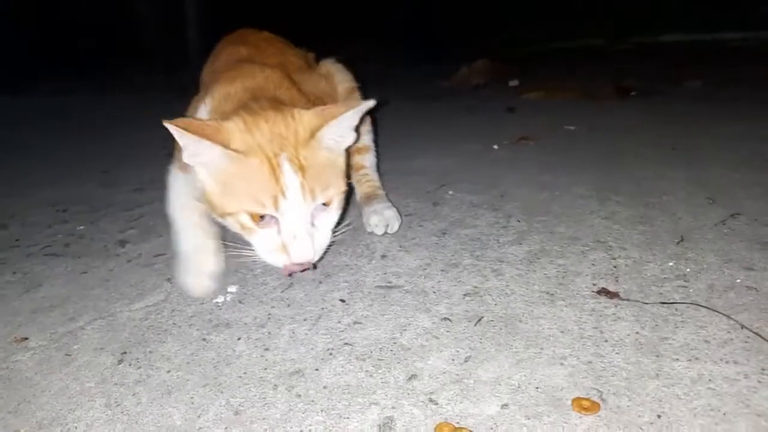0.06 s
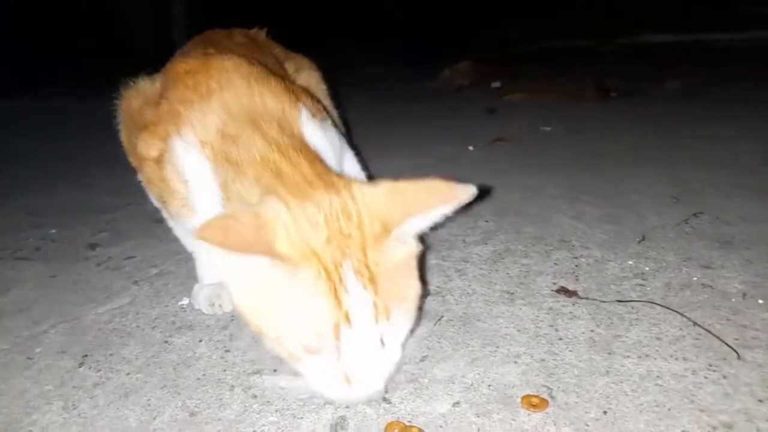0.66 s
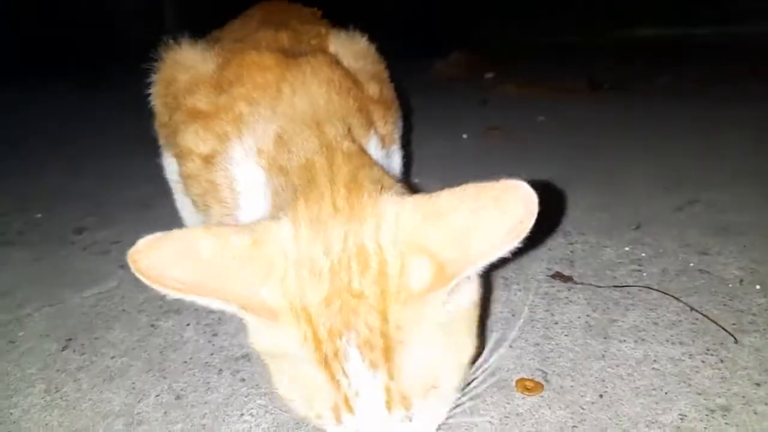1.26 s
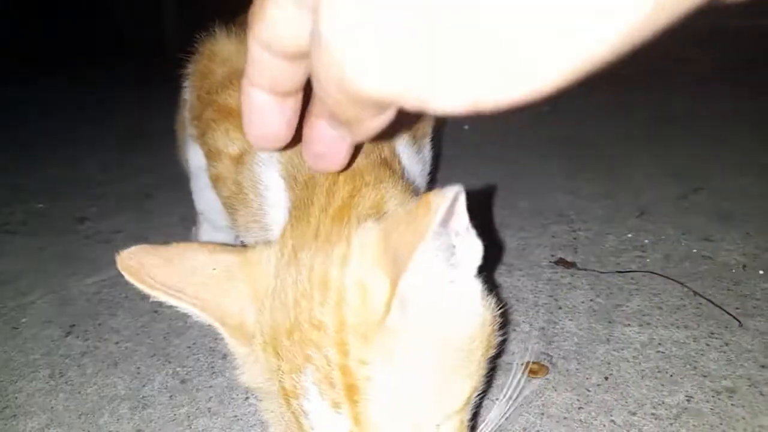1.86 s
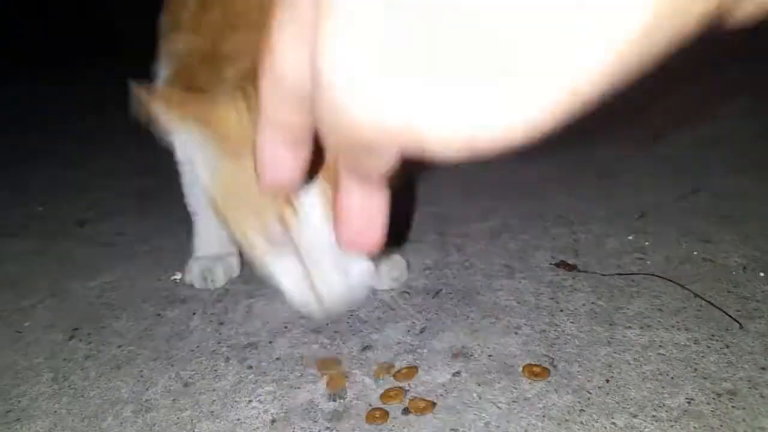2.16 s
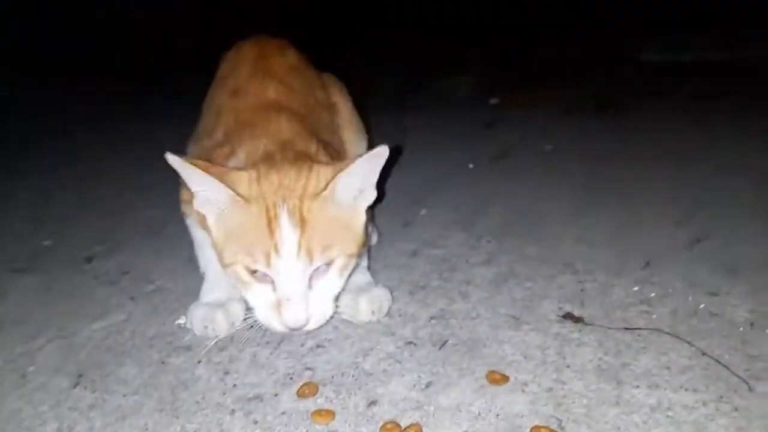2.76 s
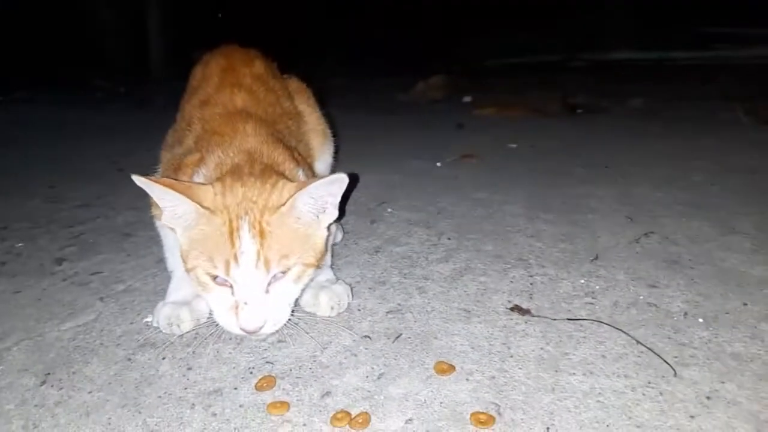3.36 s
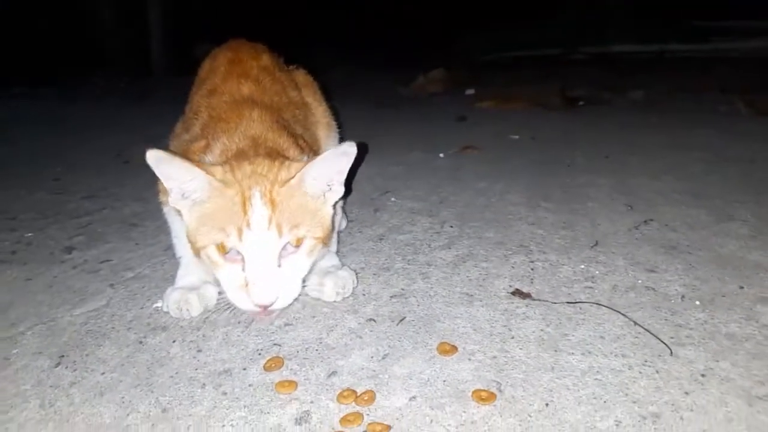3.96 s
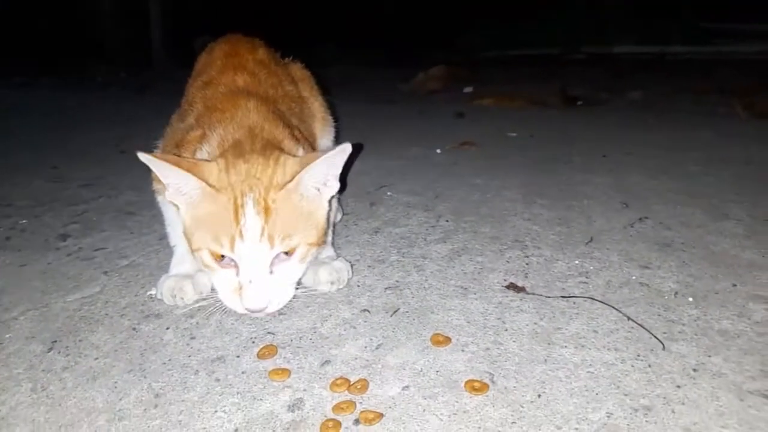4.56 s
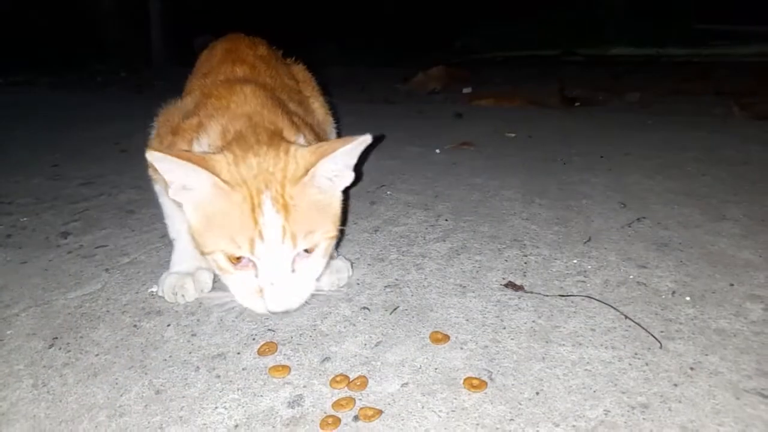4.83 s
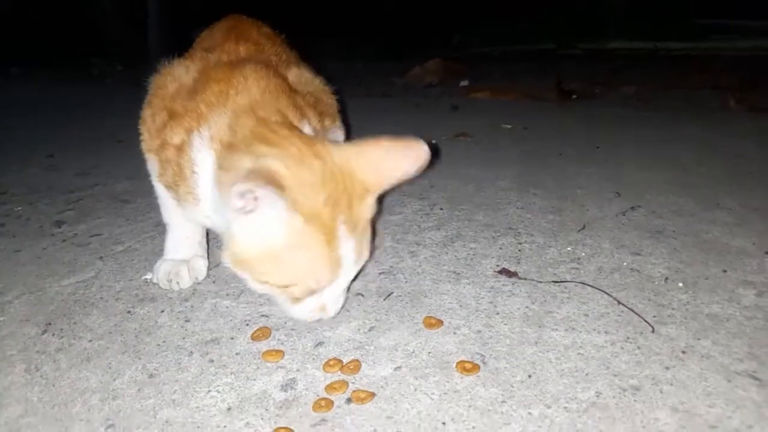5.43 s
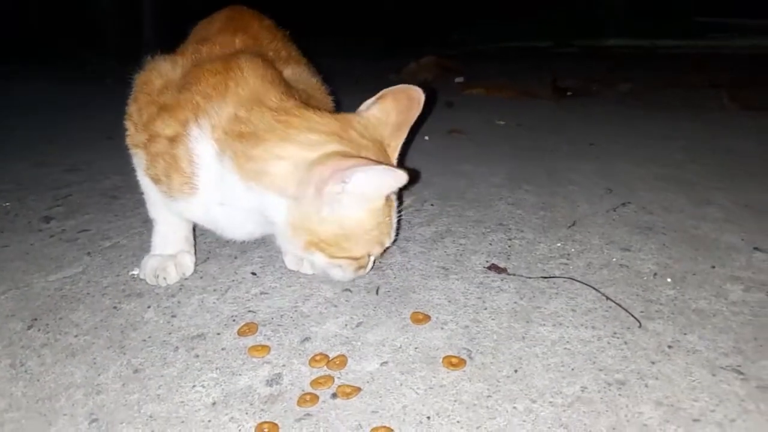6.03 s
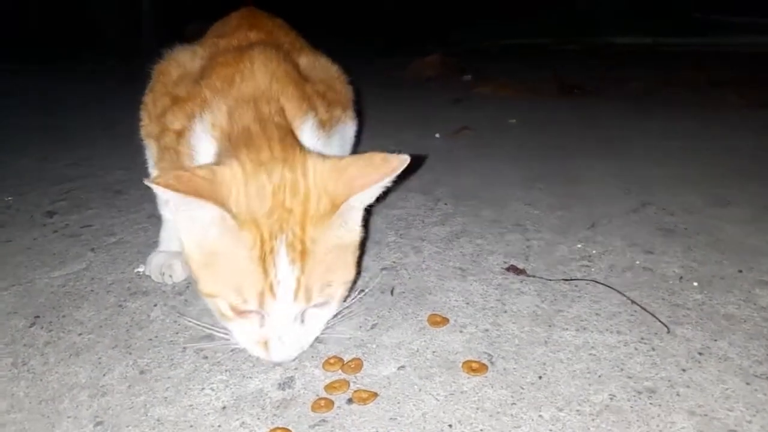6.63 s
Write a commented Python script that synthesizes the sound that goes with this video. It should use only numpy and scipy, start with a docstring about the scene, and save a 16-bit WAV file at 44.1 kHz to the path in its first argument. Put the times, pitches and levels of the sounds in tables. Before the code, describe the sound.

A low distant rumble and a faint high band of insects run throughout, heard in stereo in a concrete yard at night. In the first second a cat's paws tap very softly. A night bird gives faint thin peeps at about 0.7, 1.2, 1.8 and 4.3 seconds. Around 1.5 seconds a hand lightly brushes fur. From 2 seconds a sandal drags on grit to the right, ending in a sharp, loud scuff and low thud at 2.2. Close in front, the cat cracks and grinds dry kibble from 2.7 to 3.9 seconds, with the crispest bites between 3 and 3.4. A soft raspy lick follows near 4.2, with a fainter bite and lick around 4.5. From 4.9 seconds a food bag rustles and crackles on the right in uneven bursts, loudest around 5.6, thinning to separate crinkles by the end at about 6.6.

```python
"""A cat cracks and grinds dry kibble on a concrete yard at night, close in front of a stereo microphone pair.
Its paws tap the ground, a hand strokes its fur and a sandal scuffs the grit before it bites and licks.
Later, off to the right, a food bag rustles as its walls rub and its folds buckle.
Behind it all: a low distant rumble, a band of insects and a few thin peeps of a night bird."""
import sys
import numpy as np
from scipy import signal
from scipy.fft import rfft, irfft
from scipy.io import wavfile
from scipy.ndimage import uniform_filter1d

SR = 44100
rng = np.random.default_rng(int(sys.argv[2]) if len(sys.argv) > 2 else 0)


def master_out(mix):
    """Clip the mix to full scale and print it as 16-bit PCM to the path in sys.argv[1]."""
    frames = np.transpose(np.atleast_2d(mix))
    ceiling = np.clip(frames, -1, 1)
    pcm = np.round(ceiling * 32767).astype(np.int16)
    wavfile.write(sys.argv[1], SR, pcm)


N = 295029
TIME = np.arange(N) / SR

# reverberation of the walls around the yard: f/Hz, t60/s
YARD = [(200, 0.53), (900, .33), (2500, 0.26), (7000, 0.24), (14000, 0.3)]
# bites: t/s, crack length/s, level/dB, treble/dB, bass/dB, grinding level/dB, mouth resonance/Hz
BITES = [(2.7465, .0021, -64, 4, 3, -74, 3600), (2.7707, 0.0073, -60.5, -2, -10, -79.5, 3650),
         (2.7751, 0.0054, -46.5, 2, -7.5, -72, 3680), (2.9888, 0.0025, -35.5, 1, -28, -78, 3600),
         (2.9935, 0.0018, -30.5, 1.5, 5, -63, 3720), (3.1166, 0.00089, -30, -5, -4, -62.5, 3800),
         (3.2468, .0027, -32.5, -5, 0.5, -62.5, 3940), (3.3604, 0.0024, -34, -5, -1.5, -68, 4000),
         (3.7414, 0.0024, -62, 9, -7, -79, 3630), (3.772, 0.0015, -58.5, 12, 1, -82.5, 3560),
         (3.83, 0.0059, -50.5, 8.5, 17, -98, 3640), (4.479, 0.004, -64, -5, 12, -84, 3720)]


def amp(db):
    """Decibels to gain."""
    return 10 ** (np.asarray(db) / 20)


def unit_rms(x):
    """Scales to rms 1."""
    return x / np.sqrt(np.mean(x ** 2) + 1e-20)


def read(points, hz):
    """Reads a spectrum table on a log-frequency axis."""
    f, value = np.transpose(points)
    return np.interp(np.log(hz + 1), np.log(f + 1), value)


def add(mix, s, sound):
    """Mixes a sound in at s seconds."""
    part = mix[round(s * SR):][:len(sound)]
    part += sound[:len(part)]


def colour(x, shape, size=4096):
    """Minimum-phase filter whose gain in dB is shape(Hz)."""
    log_gain = np.log(amp(shape(abs(np.fft.fftfreq(size, 1 / SR)))) + 1e-6)
    ring = np.fft.ifft(np.exp(np.conj(signal.hilbert(log_gain)))).real
    return signal.fftconvolve(x, ring[:size // 2])[:len(x)]


def noise(spectrum):
    """Steady noise of rms 1 with a given spectrum."""
    gain = amp(read(spectrum, np.fft.rfftfreq(N, 1 / SR)))
    return unit_rms(irfft(rfft(rng.standard_normal(N)) * gain, N))


def drift(samples, passes=1):
    """Random wander of rms 1: noise under a moving average."""
    wander = rng.standard_normal(N)
    for _ in range(passes):
        wander = uniform_filter1d(wander, samples)
    return unit_rms(wander)


def grit(per_s, spread_db, smooth):
    """Tiny slips of uneven size over a share of smooth friction noise."""
    sizes = amp(spread_db * np.minimum(rng.exponential(1, N), 4)) * rng.choice([-1, 1], N)
    slips = sizes * (rng.random(N) < per_s / SR)
    return unit_rms(slips) + smooth * rng.standard_normal(N)


def friction(spectrum, per_s, spread_db, smooth):
    """Gritty slipping, coloured by a material's spectrum, at rms 1."""
    return unit_rms(colour(grit(per_s, spread_db, smooth), lambda hz: read(spectrum, hz)))


def swells(rows, rise_s, fall_s):
    """Gain over time of rows (t/s, hold/s, level/dB) that each rise, hold and die away."""
    power = np.zeros(N)
    for s, hold_s, db in rows:
        t = TIME - s
        attack = np.clip(t / rise_s, 0, 1) ** 2
        decay = np.exp(-np.clip((t - rise_s - hold_s) / fall_s, 0, 20))
        power += (amp(db) * attack * decay) ** 2
    return np.sqrt(power)


def bursts(rows, body, fall, uneven_db, rise=0.1, size=4096):
    """Each row is a quick avalanche of tiny fractures that rings a body."""
    out, t = np.zeros(N), np.arange(size) / SR
    for s, length, db, treble_db, bass_db, *_ in rows:
        push, sizes = rng.standard_normal((2, size))
        swell = (1 - np.exp(-t / (rise * length))) * np.exp(-(fall * t / length) ** 2)
        cracks = push * amp(uneven_db * np.clip(sizes, -2, 2)) * swell
        treble = lambda hz: treble_db * hz ** 4 / (hz ** 4 + 7600 ** 4)
        bass = lambda hz: bass_db / (1 + (hz / 1200) ** 4)
        sound = colour(cracks, lambda hz: body(hz) + treble(hz) + bass(hz))
        add(out, s, amp(db) * np.sqrt(length * SR) * sound / np.linalg.norm(sound))
    return out


def scatter(x, t60s, delay_s, size=22050):
    """Sparse reflections, different at each microphone, dying away by rows of f/Hz, t60/s."""
    taps = rng.choice([-1., 1.], (2, size)) * (rng.random((2, size)) < 5000 / SR)
    taps *= np.arange(size) > delay_s * SR
    hz, t, bands = signal.stft(taps, SR, nperseg=128)
    tail = signal.istft(bands * amp(-60 * t / read(t60s, hz)[:, None]), SR, nperseg=128)[1]
    tail /= np.linalg.norm(tail, axis=1, keepdims=True)
    return signal.fftconvolve(x[None], tail, axes=1)[:, :N]


def from_right(x, lag_s):
    """Sound from the right reaches the left microphone late and shaded."""
    # shading of the far microphone: f/Hz, left minus right/dB
    shade = [(100, -8), (1000, 0.5), (2400, -3.5), (4400, -2.5), (8200, -42.5), (14000, -3.5)]
    hz = np.fft.rfftfreq(N, 1 / SR)
    left = amp(read(shade, hz)) * np.exp(-2j * np.pi * hz * lag_s)
    pair = np.array([left, np.ones(len(hz))]) / np.sqrt((1 + abs(left) ** 2) / 2)
    return irfft(rfft(x) * pair, N)


def paired(source, likeness):
    """One noisy source at two microphones: the part each hears alone, and the common part."""
    return np.sqrt(1 - likeness) * np.array([source(), source()]), np.sqrt(likeness) * source()


def night_air():
    """Distant rumble, mostly common to both microphones, and hiss from all around."""
    # spectra of the night air: f/Hz, relative level/dB
    rumble_spectrum = [(20, -40), (40, -12.5), (68, 2), (90, -2), (120, 1.5), (200, -4.5), (270, -13),
                       (400, -22), (600, -37.5), (1200, -54.5), (4000, -81)]
    hiss_spectrum = [(100, 15.5), (1000, -0.5), (2500, -0.5), (4500, -5.5), (9000, -2), (12000, -6),
                     (16000, -6.5)]
    rumble = noise(rumble_spectrum) * amp([[-2.2], [1.5]])
    rumble += amp(-8) * np.array([noise(rumble_spectrum), noise(rumble_spectrum)])
    hiss = np.array([noise(hiss_spectrum), noise(hiss_spectrum)])
    return amp(-58.5) * rumble + amp(-76.5) * hiss


def insects():
    """A high choir all around the yard swells and ebbs gently."""
    # band of the choir: f/Hz, relative level/dB
    band = [(5000, -43.5), (5900, -22), (6400, -5.5), (6800, -2.5), (7300, -5), (8000, -16.5), (9500, -28),
            (12000, -28.5)]
    choir = np.array([noise(band), noise(band)]) * amp([[-1.2], [1.2]])
    ebb = amp(0.9 * drift(samples=9000, passes=2))
    return amp(-75.5) * choir * ebb


def paws():
    """Soft pads make dull taps on the concrete."""
    # paws set down: t/s, length/s, level/dB, treble/dB, bass/dB
    steps = [(.045, 0.0035, -76, -3, 13), (.092, 0.0035, -81, -6, 20), (.181, 0.0078, -72.5, 3, 13),
             (.358, .005, -84, -6, 9), (.757, 0.0026, -75, -5, -19), (4.765, 0.0016, -74, -11, 8)]
    pad = [(200, -22), (1200, 6), (2500, -4), (6000, -26), (14000, -4)]  # f/Hz, gain/dB
    taps = bursts(steps, lambda hz: read(pad, hz), fall=1.1, uneven_db=3)
    return taps + amp(-2) * scatter(taps, YARD, delay_s=0.0037)


def bird():
    """Thin, two-voiced peeps in the background scoop up to pitch and echo briefly in the yard."""
    # peeps: t/s, hold/s, relative level/dB, pitch/Hz
    peeps = [(.745, 0.069, -70, 3065), (1.233, .025, -71, 3125), (1.79, 0.083, -76.5, 3100),
             (4.3, .11, -73.5, 3140)]
    scoop_hz, scoop_s = 225, 0.022
    song = np.zeros(N)
    for s, hold_s, db, top_hz in peeps:
        hz = top_hz - scoop_hz * np.exp(-np.maximum(TIME - s, 0) / scoop_s)
        waver = 1 + 0.025 * drift(samples=120)
        phase = 2 * np.pi * np.cumsum(hz * waver) / SR
        voices = np.sin(phase) + amp(-13) * np.sin(0.83 * phase)  # the throat has a second, lower voice
        song += swells([(s, hold_s, db)], rise_s=0.055, fall_s=0.03) * unit_rms(voices)
    return amp(-4) * song + amp(-2.5) * scatter(song, [(1000, 0.15), (5000, 0.28)], delay_s=0.0057)


def stroke():
    """Hairs slip under the fingers and snap back in fine ticks."""
    # colour of the fur: f/Hz, gain/dB
    fur = [(300, 12), (1400, -10), (2000, 6), (3000, -4.5), (4600, 8), (9000, 6), (11000, 1), (16000, -7)]
    # fingers passing through it: t/s, hold/s, level/dB
    strokes = [(1.42, 0.06, -68.5), (1.61, 0.01, -66.5)]
    hairs = friction(fur, per_s=590, spread_db=4.5, smooth=0.45)
    hairs *= swells(strokes, rise_s=0.059, fall_s=0.068)
    return from_right(hairs, lag_s=0.00005) + amp(-4) * scatter(hairs, YARD, delay_s=0.0053)


def sandal():
    """On the right a sole drags, catches on grit a few times and lands with a low thud."""
    # catches: t/s, length/s, relative level/dB, treble/dB, bass/dB
    scuffs = [(2.182, 0.0069, -34, 9, -18.5), (2.1945, 0.0029, -26, 1.5, -5.5),
              (2.2033, 0.0034, -16.5, 8, 2), (2.2095, 0.0056, -27, 0, 9), (2.215, 0.005, -31, -8, -16)]
    # slides around the landing: t/s, hold/s, level/dB
    slides = [(2.022, .035, -59), (2.135, .03, -63), (2.168, 0.018, -44.5)]
    # colours of the sole and of the grit under it: f/Hz, gain/dB
    sole = [(20, -27), (120, -10), (240, -6), (360, 3.5), (600, -12.5), (920, 4.5), (1150, -10.5),
            (1550, -3.5), (2400, 1), (3300, -1), (4400, -13), (6800, -19.5), (7900, -8.5), (10000, -27.5),
            (15000, -24)]
    sand = [(100, -2.5), (900, -8.5), (1400, -6.5), (2050, 5), (3000, -4), (4500, -6), (9000, -9),
            (15000, -17)]
    scuff = amp(-3) * bursts(scuffs, lambda hz: read(sole, hz), fall=0.6, uneven_db=3)
    t = np.arange(8000) / SR
    thud = amp(-41) * np.sin(2 * np.pi * 135 * t) * np.exp(-t / 0.02)
    add(scuff, 2.211, thud)
    drag = swells(slides, rise_s=0.028, fall_s=0.037)
    sliding = lambda: drag * friction(sand, per_s=600, spread_db=3.8, smooth=0.81)
    apart, common = paired(sliding, likeness=0.49)
    near = amp(-8.5) * scatter(scuff, [(200, 0.02), (10000, 0.0075)], delay_s=0.0005)
    walls = amp(-28.5) * scatter(scuff, YARD, delay_s=0.015)
    return from_right(scuff + common, lag_s=0.00012) + apart + near + walls


def grinding():
    """Crumbs grind between the molars, muffled by the cheeks and ringing the moving mouth."""
    # crumbs heard through the cheeks: f/Hz, gain/dB
    cheeks = [(100, 2), (450, 11.5), (700, -10), (950, 0.5), (1400, 2.5), (1750, 1), (2080, 12), (2500, 0),
              (3000, -5), (4500, -22), (6000, -11), (12000, -38)]
    times, *_, levels, resonances = np.transpose(BITES)
    crumbs = grit(per_s=2000, spread_db=3.2, smooth=0.5)
    muffled = unit_rms(colour(crumbs, lambda hz: read(cheeks, hz)))
    mouth_hz = np.interp(TIME, times, resonances)
    hollow = unit_rms(mouth(mouth(crumbs, mouth_hz), mouth_hz))
    lips = amp(3 * drift(samples=1800))  # their wavering gap lets more or less of the hollow out
    lead_s, hold_s = 0.034, 0.078  # grinding starts as the teeth close, ahead of the crack
    chews = [(s - lead_s, hold_s, db) for s, db in zip(times, levels)]
    effort = swells(chews, rise_s=0.06, fall_s=0.048)
    return effort * unit_rms(muffled + amp(-9) * lips * hollow)


def mouth(x, hz, width_hz=440):
    """A cavity resonance of gain 1 that follows the curve hz."""
    turn = np.exp(2j * np.pi * np.cumsum(hz) / SR)
    pole = np.exp(-np.pi * width_hz / SR)
    return 2 * (turn * signal.lfilter([1 - pole], [1, -pole], x / turn)).real


def jaw(hz):
    """Gain in dB of the jaw's resonances over a low floor."""
    # resonances of jaw and mouth: f/Hz, width/Hz, gain/dB
    modes = [(413, 160, 1.5), (867, 64, 3.5), (2050, 205, 5.5), (2270, 790, 0), (3950, 450, 1),
             (4300, 120, -6), (6200, 860, -0.5), (9070, 570, -7), (13900, 3100, -1)]
    power = sum(amp(db) ** 2 / (1 + ((hz - f) / (width / 2)) ** 2) ** 1.33 for f, width, db in modes)
    return 10 * np.log10(power + amp(-23) ** 2)


def biting():
    """Close and straight ahead, kibble cracks and rings the jaw, with grinding between the cracks."""
    cracks = amp(-0.5) * bursts(BITES, jaw, fall=1.08, uneven_db=10)
    apart, common = paired(grinding, likeness=0.88)
    ground = amp(-4) * scatter(cracks, [(200, 0.016), (10000, 0.023)], delay_s=0.0002)
    # sound leaving in all directions carries less of the jaw's colour
    outward = bursts(BITES, lambda hz: 0.55 * jaw(hz) - 4 * hz / 15000, fall=0.95, uneven_db=20)
    walls = amp(-17.5) * scatter(outward, YARD, delay_s=0.0022)
    return cracks * amp([[-0.3], [0.3]]) + apart + common + ground + walls


def tongue():
    """The rough tongue rasps twice, close to the microphones."""
    # licks: t/s, hold/s, relative level/dB
    licks = [(4.125, 0.014, -63.5), (4.565, .005, -78)]
    # colour of the tongue: f/Hz, gain/dB
    spectrum = [(400, -31), (900, -8), (1300, 2.5), (1600, -10), (1950, -2), (2800, -29), (3850, -12.5),
                (5000, -26.5), (14000, -38)]
    rasp = friction(spectrum, per_s=1500, spread_db=3, smooth=0.69)
    rasp *= swells(licks, rise_s=0.046, fall_s=0.028)
    return amp(-6.5) * rasp + amp(-11) * scatter(rasp, [(200, 0.048), (10000, 0.045)], delay_s=0.00026)


def bag():
    """Off to the right, folds buckle in bursts while the bag's walls rub; small creases tick among them."""
    # colour of the bag: f/Hz, gain/dB
    sheet = [(20, -38), (70, -4.5), (130, -5), (260, -11), (640, -10.5), (940, 1.5), (1500, -3), (2000, -6),
             (2600, -6.5), (4100, -8), (6500, -17), (8700, -23), (10300, -32.5), (16000, -37)]
    # large folds buckling: t/s, length/s, relative level/dB, treble/dB
    large_folds = [(4.864, 0.015, -44.5, 13), (4.9645, 0.0015, -40, -9), (4.9755, 0.0016, -39, 28),
                   (5.101, 0.0028, -48, -13), (5.18, 0.016, -28.5, 7.5), (5.356, 0.0015, -44, 16),
                   (5.554, 0.006, -34.5, 10), (5.584, 0.0016, -20.5, 17), (5.671, 0.017, -29.5, 3),
                   (5.713, 0.0078, -42, -1), (5.722, 0.008, -30.5, 10), (5.8095, 0.0041, -34, 2),
                   (5.843, 0.006, -32.5, -4), (5.896, .01, -36.5, -2), (5.96, 0.012, -47, -46),
                   (6.027, 0.01, -42, -23), (6.069, 0.004, -44, -3), (6.1985, 0.0013, -36.5, 7.5),
                   (6.244, 0.0015, -40, 5), (6.296, .0014, -30.5, 1.5), (6.311, 0.0021, -40, -20),
                   (6.375, 0.0071, -49.5, -13), (6.414, 0.0083, -48.5, 24), (6.4842, 0.0016, -26.5, 20),
                   (6.5187, 0.0016, -35.5, 17), (6.5765, 0.0015, -41, 7.5)]
    pressure = pressing()
    rub = lambda: amp(-1.6) * pressure * friction(sheet, per_s=2000, spread_db=2.9, smooth=0.48)
    apart, common = paired(rub, likeness=0.85)
    snaps = grit(per_s=70, spread_db=3, smooth=0)
    bright_snaps = colour(snaps, lambda hz: read(sheet, hz) + 8 * hz / (hz + 4000))
    ticks = amp(-13) * pressure ** 0.85 * unit_rms(bright_snaps)
    small_folds = creases(pressure, start_s=large_folds[0][0], end_s=large_folds[-1][0])
    bass_db = -9.5
    folds = [(*row, bass_db) for row in list(large_folds) + small_folds]
    buckling = bursts(folds, lambda hz: read(sheet, hz), fall=0.88, uneven_db=3.5, rise=0.15)
    rustle = common + ticks + amp(-1.5) * buckling
    ringing = amp(-6) * panels(rustle)
    walls = amp(-17) * scatter(rustle, YARD, delay_s=0.0063)
    return from_right(rustle, lag_s=0.00026) + apart + ringing + walls


def pressing():
    """How hard the bag's walls press together, as a gain: it is gripped, shifted, let go and settles."""
    # walls rubbing: t/s, relative level/dB
    rubbing = [(4.82, -86.5), (4.88, -40.5), (4.92, -50.5), (5.052, -38), (5.15, -49.5), (5.182, -32),
               (5.23, -46), (5.442, -62), (5.562, -34), (5.66, -33), (5.676, -31), (5.704, -41),
               (5.724, -25), (5.756, -42.5), (5.912, -46), (5.944, -66), (6.066, -46.5), (6.186, -63),
               (6.198, -68), (6.21, -55.5), (6.285, -56.5)]
    s, db = np.transpose(rubbing)
    settle_db_per_s = 59.5
    settling_db = settle_db_per_s * np.maximum(TIME - s[-1], 0)
    return amp(np.interp(TIME, s, db) - settling_db) * (TIME > s[0])


def creases(pressure, start_s, end_s, count=40):
    """Small folds buckle at random, harder under pressure: rows of t/s, length/s, level/dB, treble/dB."""
    when, length, softness, bright = rng.uniform(-1, 1, (count, 4)).T
    s = np.interp(when, [-1, 1], [start_s, end_s])
    pressure_db = 20 * np.log10(np.interp(s, TIME, pressure) + 1e-9)
    reference_db, follow = -41, 0.66
    db = -38 + follow * (pressure_db - reference_db) - 5 * softness
    return list(zip(s, 0.002 * 2 ** length, db, 17 * bright))


def panels(x, count=7):
    """The bag changes shape: its panels take turns, each with its own short ring."""
    shares = np.array([drift(samples=1500, passes=2) for _ in range(count)]) ** 2
    shares /= np.linalg.norm(shares, axis=0)
    ring = [(200, 0.069), (2000, 0.036), (10000, 0.037)]  # f/Hz, t60/s
    return sum(scatter(x * share, ring, delay_s=0.0002, size=4096) for share in shares)


def scene():
    """The yard as it reaches the two microphones."""
    return night_air() + insects() + paws() + bird() + stroke() + sandal() + biting() + tongue() + bag()


def record(dry):
    """The recorder's low cut and band limit."""
    low_cut_hz, edge_hz = 42, 15900
    low_cut = signal.butter(2, low_cut_hz, "highpass", fs=SR, output="sos")
    band_limit = signal.firwin(511, edge_hz, window=("kaiser", 9), fs=SR)
    return signal.oaconvolve(signal.sosfilt(low_cut, dry), band_limit[None], "same")


dry = scene()
out = record(dry)
master_out(out)
```